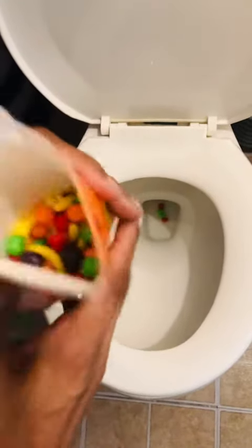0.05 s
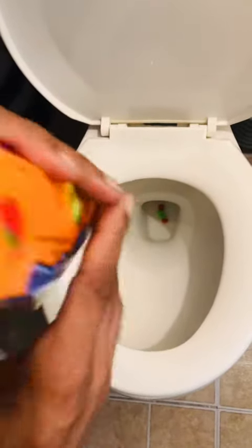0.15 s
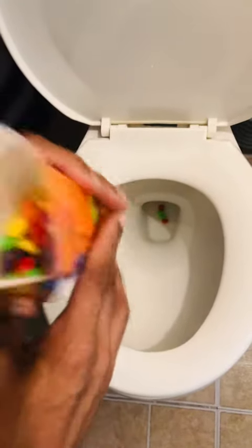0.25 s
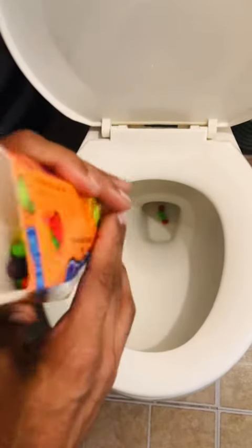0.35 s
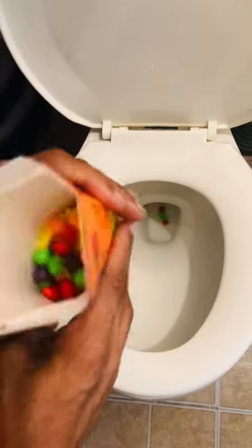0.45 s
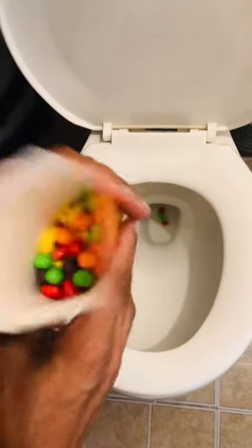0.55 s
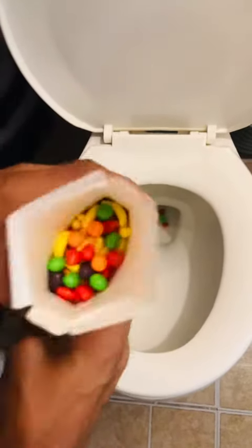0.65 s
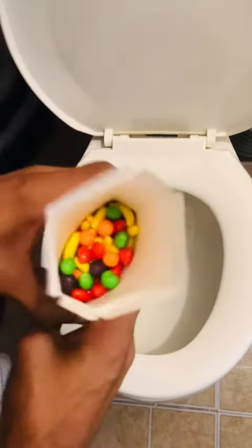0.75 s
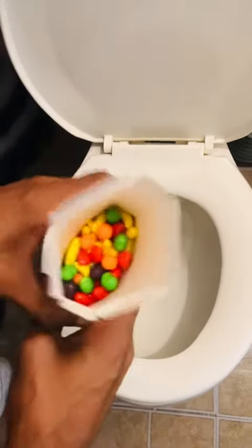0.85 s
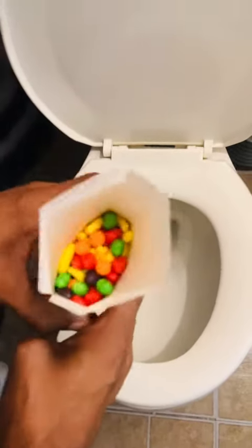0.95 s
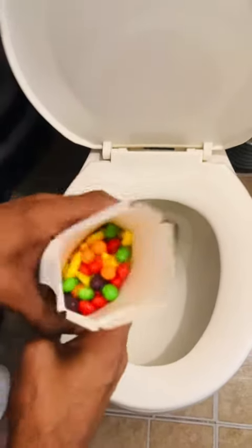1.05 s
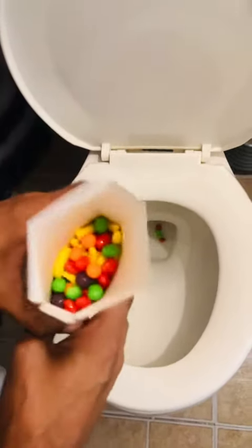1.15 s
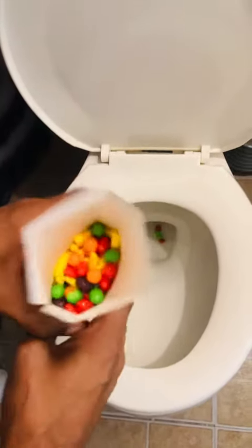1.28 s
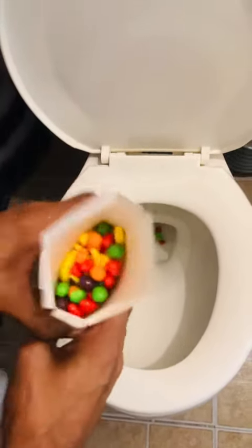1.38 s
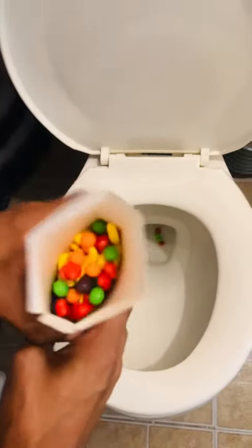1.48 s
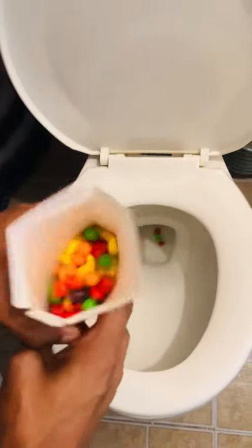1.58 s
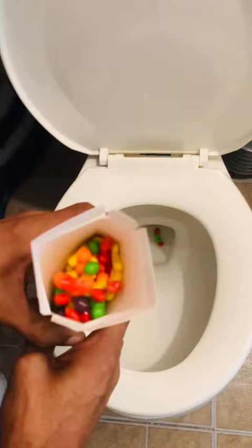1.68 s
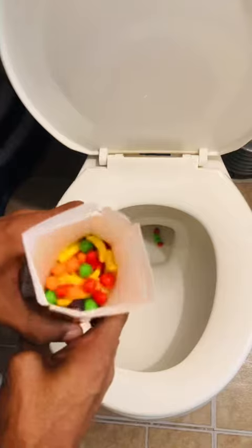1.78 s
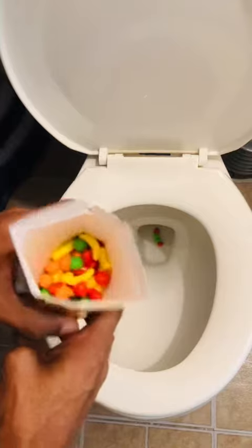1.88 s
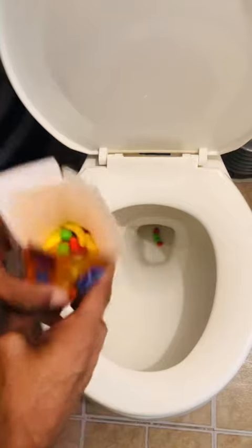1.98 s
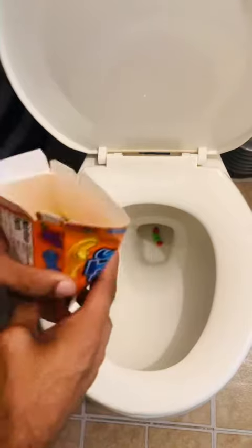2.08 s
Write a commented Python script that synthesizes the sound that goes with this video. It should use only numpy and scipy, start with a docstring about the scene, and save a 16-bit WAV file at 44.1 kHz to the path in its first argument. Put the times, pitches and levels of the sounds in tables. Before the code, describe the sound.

Hard candies rattle in a small cardboard carton, shaken briskly in a small tiled bathroom

```python
"""Hard candies in a cardboard carton, shaken about six times a second in a small tiled bathroom.
Each shake slams the heap into the wall: short pitched rings clack, ringing wall modes boom,
then the clatter sinks as the heap rolls to rest. A few stray candies tick alone as sharp ring clusters.
Feedback delays give the tiles a short, duller tail; shaped noise is the hand's low push and the faint air."""
import sys
import numpy as np
from scipy import signal
from scipy.fft import rfft, irfft, next_fast_len
from scipy.io import wavfile

SR = 44100
rng = np.random.default_rng(int(sys.argv[2]) if len(sys.argv) > 2 else 0)


def store_pcm(level_fs):
    """Save levels as 16-bit WAV."""
    pcm = np.round(np.clip(level_fs, -1, 1) * 32767).astype(np.int16)
    wavfile.write(sys.argv[1], SR, np.atleast_2d(pcm).T)


N = 92610  # 2.1 s


def from_db(db):
    """Turn decibels into an amplitude factor."""
    return 10 ** (np.asarray(db) / 20)


def at_hz(curve, hz):
    """Read a (pitch_hz, level_db) curve at any pitch, straight on a log-frequency axis."""
    points = np.array(curve)
    return np.interp(np.log(hz), np.log(points[:, 0]), points[:, 1])


def ring(clicks, hz, t60_s):
    """Two-pole resonator: a unit click sets a decaying sine of about height 1 ringing."""
    decay = from_db(-60 / (t60_s * SR))
    turn = 2 * np.pi * min(hz, .45 * SR) / SR
    poles = [1, -2 * decay * np.cos(turn), decay * decay]
    return signal.lfilter([0, np.sin(turn)], poles, clicks + 1e-18)


def collisions(rate, spread_db):
    """Random clicks of uneven size, scaled so that their power does not depend on the rate."""
    loudness = from_db(spread_db * np.minimum(rng.exponential(1, N), 4))
    sizes = loudness * rng.choice([-1, 1], N)
    return sizes * (rng.random(N) < rate / SR) / np.sqrt(rate)


# Spectrum of the bathroom's faint air: pitch_hz, level_db (relative)
AIR_SPECTRUM = [(15, -45), (25, -18), (101, -3), (598, -6.5), (1020, -3.5), (2850, -8.5), (5580, -29),
                (10900, -16), (15500, -45)]
AIR_DB = -53


def room_tone():
    """Steady faint air of the bathroom: noise shaped by a spectrum curve."""
    hz = np.maximum(np.fft.rfftfreq(N, 1 / SR), 10)
    air = irfft(rfft(rng.standard_normal(N)) * from_db(at_hz(AIR_SPECTRUM, hz)), N)
    return from_db(AIR_DB) * air / np.std(air)


HANDLING_HZ, HANDLING_DB = (46, 172), -12  # noise band; level re boom


def handling(boom_db):
    """Faint low push of the moving hand and air: band-limited noise that follows the boom."""
    push = rng.standard_normal(N) * from_db(boom_db + HANDLING_DB)
    band = signal.butter(1, HANDLING_HZ, "band", fs=SR, output="sos")
    return signal.sosfilt(band, push)


ROOM_T60_S, TILE_CUT_HZ, ROOM_DB = 0.43, 2580, -20  # decay before the tiles' dulling; lowpass; send level


def bathroom(x):
    """Ten feedback delays between tiles, duller on every round."""
    size = next_fast_len(N + SR)
    w = 2 * np.pi * np.fft.rfftfreq(size)
    dull = np.exp(-2 * np.pi * TILE_CUT_HZ / SR)
    wall = (1 - dull) / (1 - dull * np.exp(-1j * w))
    tail = 0
    for k, lag in enumerate((rng.uniform(.008, .03, 10) * SR).astype(int)):
        one_round = from_db(-60 * lag / SR / ROOM_T60_S) * wall * np.exp(-1j * w * lag)
        tail = tail + (-1) ** k * one_round / (1 - one_round)
    return irfft(rfft(x, size) * tail, size)[:N]


# Lone candies: start_s, level_db (peak of the bright part), pitch_hz (held to 11200 at most)
TICKS = [(0.0074, -22, 9500), (0.0244, -20, 10100), (0.0374, -20, 10300), (0.0472, -7, 12100),
         (0.0515, -15, 11200), (0.0644, -8, 10800), (0.0671, -21, 12000), (0.081, -23, 12100),
         (0.0868, -29, 8500), (0.0989, -32, 8200), (0.13, -38, 8200), (0.1648, -21, 10500),
         (0.1869, -23, 11100), (0.6091, -2, 10400), (0.7249, -10, 10400), (0.7363, -19, 8500),
         (0.7413, -24, 8100), (0.8005, -34, 9100), (0.819, -39, 8400), (0.8378, -27, 8400),
         (1.659, -10, 7700), (1.7679, -10, 9400), (1.7871, -17, 10500), (1.8, -4, 10900),
         (1.8327, -16, 10000), (1.8354, -19, 9300), (1.8629, -30, 9300), (1.8842, -38, 8900),
         (1.9006, -40, 8900), (1.9206, -40, 7800), (1.9334, -30, 10400), (1.9468, -36, 9500),
         (1.96, -39, 8600), (1.988, -36, 9000), (2.0092, -40, 8400), (2.0222, -26, 9900),
         (2.0355, -40, 10900), (2.0579, -30, 8100), (2.0627, -22, 11600), (2.0862, -32, 7300),
         (2.0931, -35, 11100)]
TICK_T60_S, TICK_RISE_S = .006, .00015
THUD_T60_S, THUD_DB = .008, -16  # level re the bright part


def ticks():
    """A lone candy: a sharp cluster of rings around its pitch, and a small thud on the card."""
    out, t = np.zeros(N + 1000), np.arange(1000) / SR
    ratios = np.linspace(.72, 1.36, 10) * rng.uniform(.95, 1.05, (len(TICKS), 10))
    phases = rng.uniform(0, np.pi, (len(TICKS), 10))
    bright_fade = from_db(-60 * t / TICK_T60_S) * np.minimum(t / TICK_RISE_S, 1)
    thud = np.sin(2 * np.pi * 1150 * t) + .5 * np.sin(2 * np.pi * 3200 * t)
    thud = from_db(THUD_DB) * thud * from_db(-60 * t / THUD_T60_S)
    for (start_s, level_db, pitch_hz), near, phase in zip(TICKS, ratios, phases):
        hz = min(pitch_hz, 11200)
        cluster = sum(np.sin(2 * np.pi * hz * k * t + p) for k, p in zip(near, phase))
        bright = cluster * bright_fade
        i = int(start_s * SR)
        out[i:i + 1000] += from_db(level_db) * (bright / np.abs(bright).max() + thud)
    return out[:N]


# One list per shake, from its slam to the next; the first is a light stir before the first slam.
# time_s, clatter_db, then re clatter: boom_db (hollow), knock_db (upper), treble_db (top)
SHAKES = [
    [(0.145, -39.5, 4, -6, -7), (0.185, -36.5, 4.5, 3, -8), (0.195, -34.5, 0.5, 5, -3),
     (0.217, -27, -0.5, -0.5, -3.5), (0.245, -27.5, -1, 5, -4), (0.257, -30.5, -1, 5, -6),
     (0.265, -26, -4, 7, -2)],
    [(0.271, -9, -19, -6, -6), (0.291, -14.5, -3.5, -7.5, 1), (0.359, -31.5, -0.5, 2, -9),
     (0.423, -31.5, -1, -1.5, -3), (0.43, -25, 4, 1, -12)],
    [(0.438, -14, -3, 6, 0.5), (0.48, -18.5, 3, -14, -3.5), (0.532, -37.5, -15, 7, -8),
     (0.566, -36, 0, -9, -4), (0.578, -28.5, 1.5, 4, -11)],
    [(0.588, -10.5, -8.5, 3, -8), (0.608, -19, -9.5, -10.5, 1.5), (0.66, -41.5, -4, -10, -14),
     (0.712, -44, -22, -6, -9)],
    [(0.8, -50, 0, -5, -10), (0.81, -43, -7, -8, -24), (0.82, -49, -17, 1, -11), (0.828, -42, 2, -2, -17),
     (0.84, -37.5, -7, -3, -13), (0.86, -39, 4, -8, -4), (0.866, -28, 9.5, 4, -6)],
    [(0.876, -14.5, -21, 3, -4), (0.886, -10.5, -12.5, -1, -2), (0.92, -30, 2, -1, 1),
     (0.968, -38, -13, -8, -11), (1.008, -41, 2, 7, -4), (1.024, -30.5, -4, -3, -9)],
    [(1.034, -17.5, 1, 4, -5), (1.06, -14, -11, -2.5, -1.5), (1.128, -36.5, 2, -2, -10.5),
     (1.148, -48, -14, 8, -4), (1.186, -33, -4, -10, -10), (1.194, -31, -12.5, 4, 2)],
    [(1.204, -13, -8.5, -0.5, -2), (1.224, -16, -2.5, -8.5, 2.5), (1.256, -32.5, 0.5, -0.5, -8),
     (1.304, -43, -2, -1, -9), (1.338, -34.5, -8, 0, -6), (1.356, -35, -3, 4, -3),
     (1.364, -26.5, 5.5, 2, 0)],
    [(1.376, -11.5, -22, -2.5, -11), (1.39, -13, -5.5, -3.5, 0), (1.456, -34.5, -0.5, 1.5, -7.5),
     (1.504, -32.5, -2, -2, -3.5), (1.516, -28.5, 3, -4, -1)],
    [(1.532, -16.5, -3, 5.5, -4.5), (1.544, -14, -13, 1.5, -1.5), (1.566, -18, 0, -6.5, -1),
     (1.6, -24, 4.5, 4, -6), (1.64, -32, -2, 2, -3.5), (1.674, -25, -16, -2, -3)],
    [(1.683, -13, 0.5, -5, -9), (1.689, -15.5, -4, 4, 1), (1.719, -15.5, -3.5, -6.5, -2),
     (1.76, -27.5, 1.5, -3, -2.5)],
]
# The heap rolls to rest or stirs lightly: time_s, clatter_db, then re clatter: boom_db, knock_db, treble_db
SETTLING = [
    [(0, -32, 0, -2, -8), (.04, -36, -1, -3, -9), (.06, -41, 0, -3, -11), (.075, -39, 0, -3, -11),
     (.1, -44, 0, -3, -13), (.14, -47, 2, -2, -14)],
    [(.718, -33, -4, -3, -3), (.735, -31, -4, -4, -4), (.755, -35, 2, -4, -8), (.772, -45, 3, 0, -14),
     (.792, -50, 3, 0, -14)],
    [(1.79, -34, 1, -1, -4), (1.815, -37, 1, -1, -6), (1.84, -37, 1, -1, -7), (1.87, -48, 3, 0, -11),
     (1.93, -51, 2, 0, -11), (1.98, -54, 3, 0, -13), (2.015, -55, 0, -3, -10), (2.025, -47, -4, -4, -6),
     (2.045, -54, -2, -3, -8), (2.062, -40, -5, -1, -4), (2.08, -51, -3, -2, -9), (2.1, -54, 0, 0, -8)],
]


def shake_controls():
    """Clatter, boom, knock and treble levels in time, and vigour in dB under the strongest slam."""
    rows = np.vstack([*SHAKES, *SETTLING])
    time_s, *columns = rows[np.argsort(rows[:, 0])].T
    t = np.arange(N) / SR
    clatter_db, boom, knock, treble = [np.interp(t, time_s, column) for column in columns]
    vigour_db = clatter_db - clatter_db.max()
    return clatter_db, clatter_db + boom, clatter_db + knock, clatter_db + treble, vigour_db


RATE_FOLLOWS = .38  # share of the level's swing in dB that the collision rates follow

# Modes of the carton walls and air: pitch_hz, level_db (re boom below 800 Hz, re knock above), t60_s
CARTON_MODES = [(185, -20, 0.053), (303, -5.5, 0.17), (380, -2.5, 0.2), (437, -5.5, 0.063),
                (530, 9.5, 0.048), (633.4, 4.5, 0.093), (706, 1, 0.14), (770.5, 4.5, 0.047),
                (886, 4, 0.034), (1095, 7, 0.016), (1190, 2.5, 0.028), (1300, 2, 0.029), (1540, 2, 0.016),
                (2250, 1.5, 0.0088)]
WALL_HITS_PER_S, WALL_SPREAD_DB = 2500, 2  # rate at the strongest slam; unevenness


def carton(boom_db, knock_db, vigour_db):
    """Candies strike the cardboard wall; every mode answers each hit with its own strength."""
    hits = collisions(WALL_HITS_PER_S * from_db(RATE_FOLLOWS * vigour_db), WALL_SPREAD_DB)
    hits = hits / np.std(hits)
    out = np.zeros(N)
    for hz, level_db, t60_s in CARTON_MODES:
        drive_db = level_db + (boom_db if hz < 800 else knock_db)
        struck = hits * rng.standard_normal(N) * from_db(drive_db)
        out += ring(struck, hz, t60_s) / np.sqrt(t60_s * SR)  # long modes come out no louder
    return out


def inside(x):
    """Close reflections in the carton smear each click over a few milliseconds: two allpass delays."""
    gain = .45
    for delay_s in (.0005, .0013):
        gap = np.zeros(int(delay_s * SR))
        x = signal.lfilter([-gain, *gap, 1], [1, *gap, -gain], x)
    return x


# Colour of the candies' clack: pitch_hz, level_db (relative, per Hz)
CLACK = [(880, -30), (1500, -8), (1760, -14), (2380, 0), (2680, -0.5), (2900, -1.5), (5730, -6),
         (9470, -8.5), (15000, -16), (15800, -9.5)]
CLACK_CYCLES = 9.4  # cycles to fall 60 dB at 4 kHz; grows with the root of pitch
COLLISIONS_PER_S, SIZE_SPREAD_DB = 11000, 3  # rate at the strongest slam; unevenness


def candies(clatter_db, treble_db, vigour_db):
    """Each collision rings briefly at one of 28 pitches; harder shaking brings more of them."""
    clicks = collisions(COLLISIONS_PER_S * from_db(RATE_FOLLOWS * vigour_db), SIZE_SPREAD_DB)
    pitches, dealt = np.geomspace(1500, 16000, 28), rng.integers(0, 28, N)
    rings = []
    for k, hz in enumerate(pitches):
        t60_s = CLACK_CYCLES * np.sqrt(hz / 4000) / hz
        struck = ring(clicks * (dealt == k), hz, t60_s)
        rings.append(from_db(at_hz(CLACK, hz)) * hz * struck)
    mid = inside(sum(rings[:20]))
    top = inside(sum(rings[20:]))  # from about 8.7 kHz
    return from_db(clatter_db) * mid / np.std(mid) + from_db(treble_db) * top / np.std(top)


def scene():
    """The shaken carton, thinned in the bass, with its tiled tail over handling and room air."""
    clatter_db, boom_db, knock_db, treble_db, vigour_db = shake_controls()
    near = candies(clatter_db, treble_db, vigour_db)
    near = near + carton(boom_db, knock_db, vigour_db) + ticks()
    thin = signal.butter(4, 244, "high", fs=SR, output="sos")  # the near sounds carry little below about 244 Hz
    near = signal.sosfilt(thin, near)
    mix = near + from_db(ROOM_DB) * bathroom(near) + handling(boom_db) + room_tone()
    return mix[None]


CEILING, CUTOFF_HZ = 1.0, 16400


def record(dry):
    """Peaks are rounded by a soft ceiling, then the top is cut steeply."""
    rounded = CEILING * np.tanh(dry / CEILING)
    return signal.sosfilt(signal.cheby2(16, 80, CUTOFF_HZ, fs=SR, output="sos"), rounded)


dry = scene()
out = record(dry)
store_pcm(out)
```